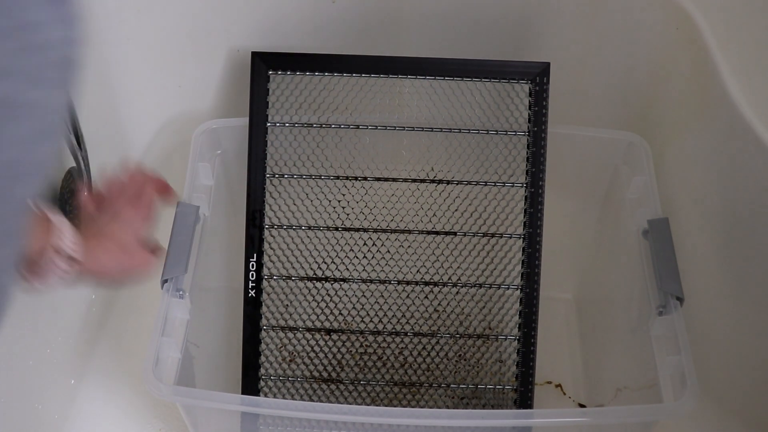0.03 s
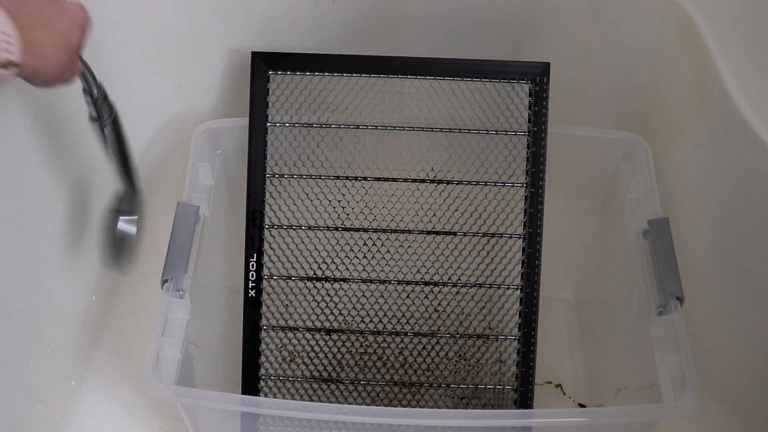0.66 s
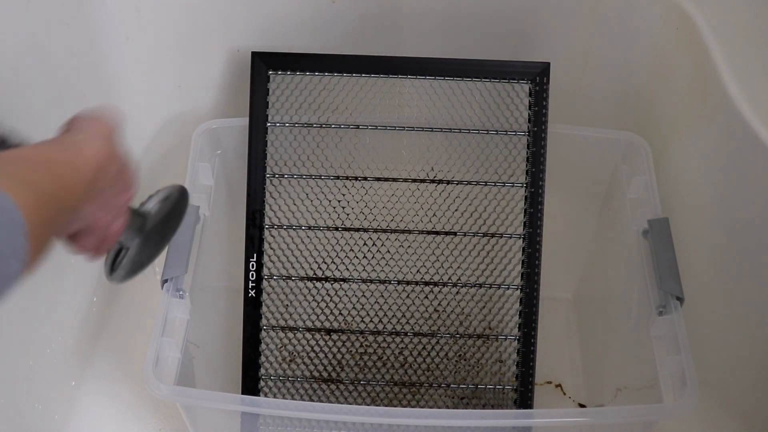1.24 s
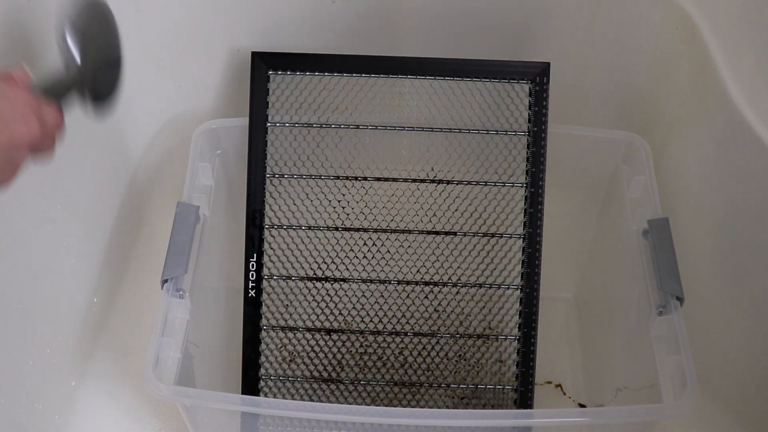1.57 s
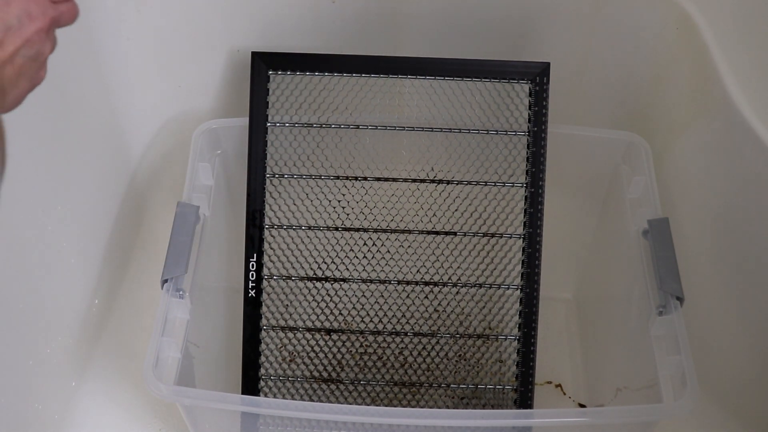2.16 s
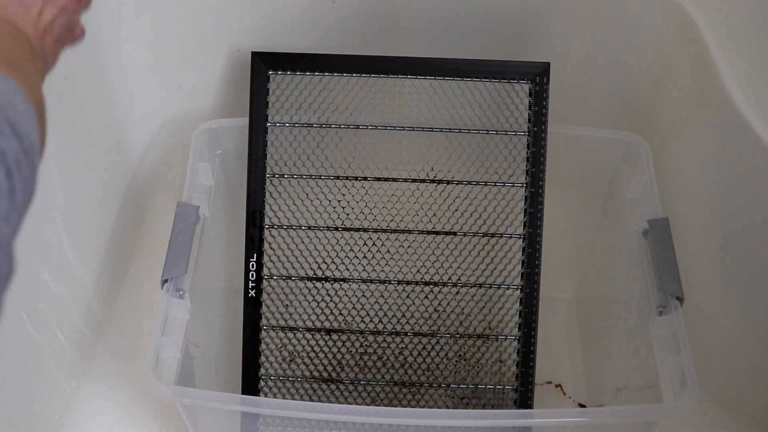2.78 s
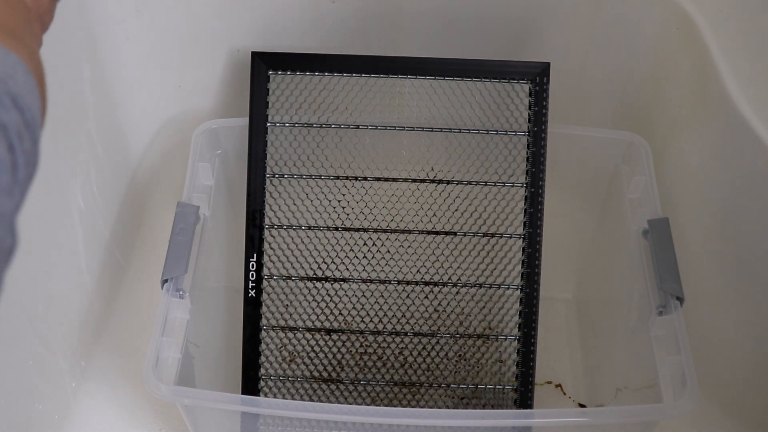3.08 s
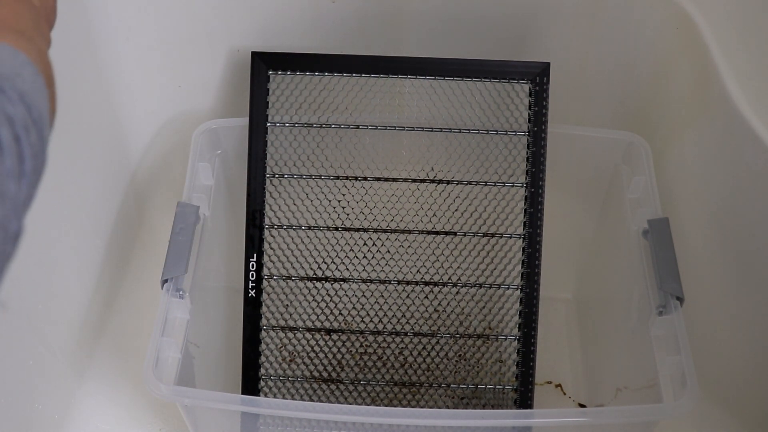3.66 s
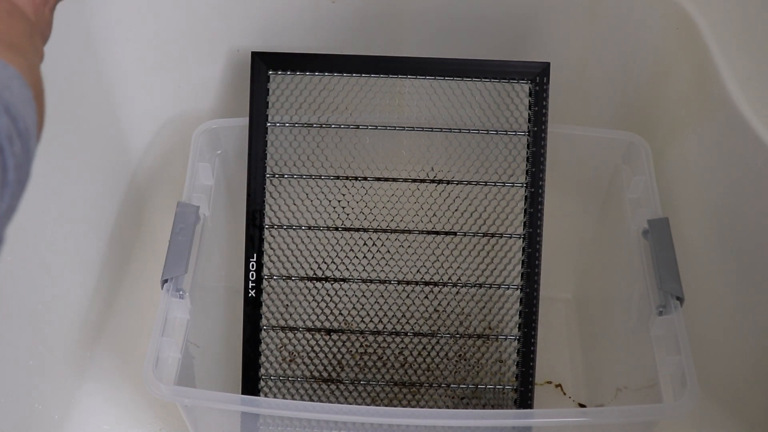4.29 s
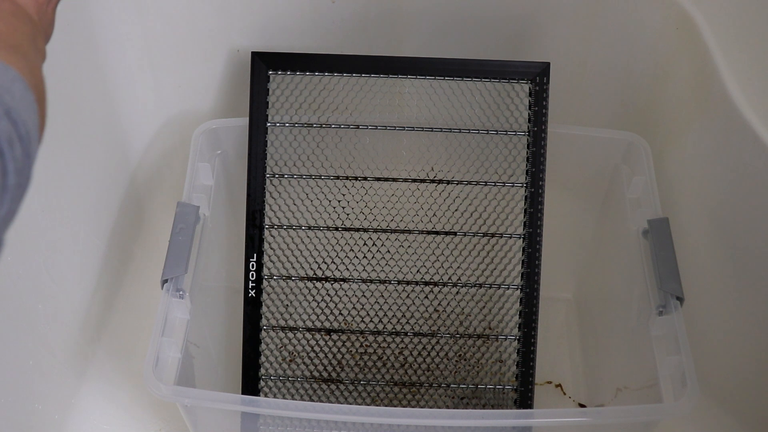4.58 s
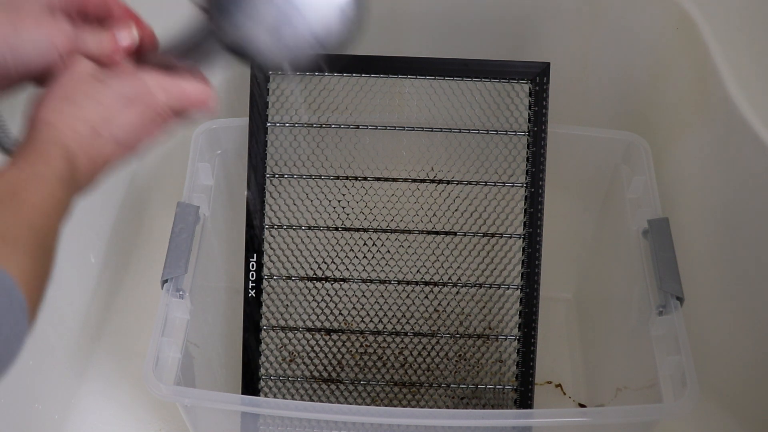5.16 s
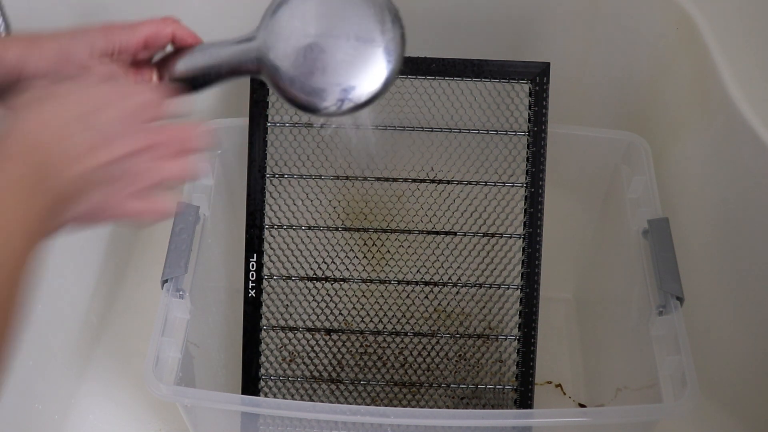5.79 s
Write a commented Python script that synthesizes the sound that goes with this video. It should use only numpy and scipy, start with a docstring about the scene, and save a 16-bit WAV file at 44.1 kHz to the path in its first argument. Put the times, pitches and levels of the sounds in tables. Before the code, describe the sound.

After a few clacks and a tap opening, shower water hisses against a bathtub, then splatters over metal mesh and a hollow plastic bin.

```python
"""Hand shower in a bathtub.

A shower head is picked up with light knocks, squeaks and a brush of the sleeve; the tap is opened.
The jets hiss and patter on the tub wall, then swing over a metal honeycomb grid, which sizzles, and
a plastic tote, which drums. Knocks and random drop impacts drive resonances and filters.
A small hard bathroom answers."""
import sys
import numpy as np
from scipy import signal
from scipy.fft import rfft, irfft, next_fast_len
from scipy.io import wavfile
from scipy.ndimage import map_coordinates

SR = 44100
rng = np.random.default_rng(int(sys.argv[2]) if len(sys.argv) > 2 else 0)


def waveform_to_disk(signal):
    """Save audio, clipped to [-1, 1], as 16-bit WAV at the path in sys.argv[1]."""
    frames = np.transpose(np.atleast_2d(signal))
    scaled = np.clip(frames, -1, 1) * 32767
    samples = np.round(scaled).astype(np.int16)
    wavfile.write(sys.argv[1], SR, samples)


N = 257103

WATER_ON_S, SWING_S, GRID_S, TOTE_S = 2.189, 3.88, 4.26, 4.385  # jets start, swing, reach grid, tote

# hollow tub: freq_hz, width_hz, gain_db
TUB_MODES = [(85.4, 27, -5.5), (183, 25, -2.5), (243, 43, 2), (313, 65, -1), (437, 230, -6)]
# metal hose and nut: freq_hz, width_hz, gain_db
HOSE_MODES = [(8600, 740, -1), (9200, 420, 4.5), (10000, 1800, -5), (11460, 180, -5), (13000, 2300, -24)]
# hard contact: freq_hz, gain_db
CLICK_SPECTRUM = [(100, 5), (700, -4.5), (1500, -2.5), (3800, 8), (6500, 2.5), (10000, 0.5), (15500, -12)]
# tub wall: freq_hz, width_hz, gain_db
WALL_MODES = [(1069, 125, 1.5), (1270, 90, 2.5)]
# bursting drops: freq_hz, gain_db
SPLASH_SPECTRUM = [(700, -33), (1500, -5.5), (2200, -3), (3300, -1.5), (4700, -1.5), (6300, -4), (9000, -8),
                   (12000, -13.5), (14000, -17), (16000, -27)]
# sheets of water bursting off wall and grid: start_s, length_s, level_db
GUSHES = [(2.22, 0.1, -35.5), (2.66, 0.11, -33), (4.26, 0.067, -25), (4.46, 0.096, -32), (4.63, 0.045, -27),
          (4.79, 0.03, -23), (4.88, 0.12, -27), (5.17, 0.035, -26.5), (5.445, 0.035, -41),
          (5.52, 0.046, -29)]
# jet force on the honeycomb: time_s, level_db
GRID_FORCE = [(4.28, -27.5), (5.198, -22.5), (5.216, -23), (5.402, -24), (5.418, -26.5), (5.466, -22),
              (5.57, -29), (5.83, -35.5)]


def amp(db):
    """Decibels to gain."""
    return 10 ** (np.asarray(db) / 20)


def unit(x):
    """Scale to rms 1."""
    return x / np.sqrt(np.mean(x ** 2) + 1e-20)


def along(points, hz):
    """Interpolate (freq_hz, value) points on a log axis."""
    freq_hz, values = np.transpose(points)
    return np.interp(np.log(hz + 1), np.log(freq_hz + 1), values)


def envelope(points):
    """Gain through (time_s, level_db) points; fades 600 dB/s outside them."""
    time_s, level_db = np.transpose(points)
    t = np.arange(N) / SR
    outside_s = np.abs(t - np.clip(t, time_s[0], time_s[-1]))
    return amp(np.interp(t, time_s, level_db) - 600 * outside_s)


def held(start_s, end_s, attack_s, release_s):
    """Gain that rises from start_s, holds, and decays after end_s."""
    t = np.arange(N) / SR
    rise = 1 - np.exp(-np.maximum(t - start_s, 0) / attack_s)
    return rise * np.exp(-np.maximum(t - end_s, 0) / release_s)


def swells(rows, shape=0.38):
    """One arch of gain per (start_s, length_s, level_db); higher shape is more peaked."""
    t = np.arange(N) / SR
    return sum(amp(db) * np.abs(np.sin(np.pi * np.clip((t - start_s) / length_s, 0, 1))) ** shape
               for start_s, length_s, db in rows)


def wobble(rate_hz):
    """Smooth random curve, rate_hz knots a second."""
    knots = rng.standard_normal(int(N * rate_hz / SR) + 4)
    return map_coordinates(knots, [np.arange(N) * rate_hz / SR])


def filtered(x, response):
    """Apply a complex frequency response."""
    size = 2 * next_fast_len((N + SR) // 2)
    return irfft(rfft(x, size) * response(np.fft.rfftfreq(size, 1 / SR)), size)[:N]


def same_power(response):
    """Scale a response so white noise keeps its level."""
    return response / np.sqrt(np.mean(np.abs(response) ** 2))


def coloured(x, points):
    """Minimum-phase filter through (freq_hz, gain_db) points; rolls off below the first."""
    def response(hz):
        skirt = np.minimum(hz / points[0][0], 1) ** 2
        cepstrum = irfft(np.log(amp(along(points, hz)) * skirt + 1e-6))
        half = len(cepstrum) // 2
        causal = np.r_[cepstrum[0], 2 * cepstrum[1:half], np.zeros(half)]
        return same_power(np.exp(rfft(causal)))
    return filtered(x, response)


def ringing(x, modes):
    """Parallel (freq_hz, width_hz, gain_db) resonances of alternating sign."""
    def response(hz):
        return same_power(sum(
            (-1) ** k * amp(db) * 1j * hz * width_hz / (mode_hz ** 2 - hz ** 2 + 1j * hz * width_hz)
            for k, (mode_hz, width_hz, db) in enumerate(modes)))
    return filtered(x, response)


def patchy(x, depth_db, width_hz, length_s):
    """Random gain patches in time and frequency: the jets keep finding new spots."""
    spectrum = signal.stft(x, SR, nperseg=512)[2]
    bins, frames = np.indices(spectrum.shape)
    where = [bins * SR / 512 / width_hz, frames * 256 / SR / length_s]
    field = map_coordinates(rng.standard_normal(spectrum.shape), where, mode="wrap")
    return signal.istft(spectrum * amp(depth_db * field), SR, nperseg=512)[1][:N]


def impacts(rate_hz, spread_db):
    """Randomly timed impulses of log-normal size; rms 1."""
    count = int(rate_hz * N / SR)
    sizes = amp(spread_db * np.clip(rng.standard_normal(count), -2.5, 2.5))
    sizes *= rng.choice([-1, 1], count)
    return unit(np.bincount(rng.integers(0, N, count), sizes, N))


def plinks(rate_hz, centre_hz, scatter, decay_cycles, spread_db):
    """Tiny damped rings at random times and pitches; rms 1."""
    count = int(rate_hz * N / SR)
    pitch, size = np.clip(rng.standard_normal((2, count, 1)), -2.2, 2.2)
    k = np.arange(SR // 100)
    cycles = centre_hz * np.exp(scatter * pitch) * k / SR
    rings = amp(spread_db * size) * np.sin(2 * np.pi * cycles) * np.exp(-cycles / decay_cycles)
    onsets = rng.integers(0, N, (count, 1))
    motion = np.bincount((onsets + k).ravel(), rings.ravel(), N)[:N]
    return unit(np.gradient(motion))  # only the change of motion radiates


def blows(times_s, levels_db, t60_s, room_t60_s, wet_db):
    """Per contact: a sharp push, a dying chatter and a diffuse echo off the tiles."""
    force, t = np.zeros(N + SR), np.arange(SR // 4) / SR
    for start_s, db, chatter_s in zip(times_s, levels_db, np.broadcast_to(t60_s, len(times_s))):
        chatter, echo = rng.standard_normal((2, len(t)))
        chatter *= amp(-60 * t / chatter_s)
        chatter *= 1 - np.exp(-2 * t / chatter_s ** 2)  # long, sliding contacts start softly
        chatter[0] = 4 * np.exp(-chatter_s / 0.065)  # brief contacts push harder
        echo *= amp(-60 * t / room_t60_s) * (1 - np.exp(-t / 0.0021))
        echo = amp(wet_db) * np.sqrt(np.mean(chatter ** 2)) * unit(echo)
        force[round(start_s * SR):][:len(t)] += amp(db) * (chatter + echo)
    return force[:N]


def sing(rows):
    """One swell of narrow-band noise per row."""
    t, out = np.arange(N) / SR, np.zeros(N)
    for start_s, length_s, pitch_hz, width_hz, db in rows:
        phase = 2 * np.pi * pitch_hz * t
        tone = unit(wobble(width_hz) * np.cos(phase) + wobble(width_hz) * np.sin(phase))
        out += amp(2.2 * wobble(30)) * swells([(start_s, length_s, db)]) * tone
    return out


def bathroom(x, wet_db):
    """Direct sound plus the tiles' dense echo, at about equal total power."""
    # room decay: freq_hz, t60_s
    decay = [(150, 0.3), (600, 0.64), (2500, 0.49), (8000, 0.067), (15000, 0.11)]
    hz, t, noise = signal.stft(rng.standard_normal(SR // 2), SR, nperseg=256)
    tail = signal.istft(noise * amp(-60 * t / along(decay, hz)[:, None]), SR, nperseg=256)[1]
    delayed = np.pad(x, (SR // 250, 0))
    echo = signal.fftconvolve(delayed, tail / np.sqrt(np.sum(tail ** 2)))[:N]
    return (x + amp(wet_db) * echo) / np.hypot(1, amp(wet_db))


def room_air():
    """Faint steady room noise."""
    # air: freq_hz, gain_db
    spectrum = [(15, -61), (25, -31), (70, -17), (82, -10), (242, -6.5), (326, -4), (416, -7), (775, -12),
                (1520, -15), (9840, -21.5), (14800, -22.5), (16000, -25.5)]
    return amp(-66) * coloured(rng.standard_normal(N), spectrum)


def squeaks():
    """The hand rubs on the shower head."""
    # rubs: start_s, length_s, pitch_hz, width_hz, level_db
    rubs = [(0.44, 0.086, 1350, 704, -70), (0.56, 0.1, 1300, 700, -69), (1.566, 0.075, 440, 160, -57),
            (1.645, 0.035, 4000, 700, -60), (1.76, 0.023, 2870, 220, -45), (1.78, 0.05, 2800, 149, -56)]
    return sing(rubs)


def knocks():
    """Each knock shakes tub, head shell and metal hose in its own proportions."""
    # contacts: start_s, thud_db, clack_db, click_db, tick_db, t60_s
    contacts = [(0.475, -62, -65, -70, -45, 0.15), (0.68, -68, -73, -58, -54, 0.21),
                (0.721, -54, -49, -35.5, -39, 0.016), (1.188, -62, -66, -52, -41, 0.022),
                (1.194, -43.5, -20, -32, -33.5, 0.017), (1.340, -64, -28, -38.5, -55, 0.013),
                (1.475, -70, -70, -70, -52, 0.063), (1.568, -59, -52, -40, -22.5, 0.008),
                (1.574, -52, -54, -36.5, -28, 0.013), (1.686, -51, -55, -47, -37, 0.019),
                (1.699, -60, -58, -44, -41, .012), (1.706, -34, -30, -29, -24.5, 0.014),
                (1.745, -50, -60, -54, -60, 0.045), (1.843, -62, -54, -54, -45, 0.099),
                (1.88, -54, -62, -60, -46, 0.22), (2.121, -58, -72, -70, -50.5, 0.06),
                (3.9302, -54, -25, -24, -16, 0.0072)]
    # shower head shell: freq_hz, width_hz, gain_db
    shell_modes = [(1620, 250, -3.5), (2040, 240, -1), (2680, 420, 0), (3460, 930, -8), (5050, 650, -7.5),
                   (6700, 600, -14.5)]
    # the small shell radiates no bass: freq_hz, gain_db
    shell_radiation = [(500, -8), (1100, 3), (1450, -1), (7000, -0.5), (9000, -42), (15000, -41)]
    start_s, thud_db, clack_db, click_db, tick_db, t60_s = np.transpose(contacts)
    thud = ringing(blows(start_s, thud_db, t60_s, room_t60_s=0.42, wet_db=6.5), TUB_MODES)
    shell = ringing(blows(start_s, clack_db, t60_s, room_t60_s=0.28, wet_db=1), shell_modes)
    clack = amp(-4.5) * coloured(shell, shell_radiation)
    click = coloured(blows(start_s, click_db, t60_s, room_t60_s=0.32, wet_db=2), CLICK_SPECTRUM)
    tick = ringing(blows(start_s, tick_db, t60_s, room_t60_s=0.21, wet_db=0), HOSE_MODES)
    return thud + clack + click + tick


def sleeve_and_hose():
    """Cloth brushes and the hose slides as the arm reaches for the shower head."""
    # sleeve stroke: start_s, length_s, level_db
    stroke = [(1.02, 0.59, -51.5)]
    # cloth friction: freq_hz, gain_db
    cloth_spectrum = [(180, -36), (300, -3), (490, -13.5), (959, -9), (1040, -15), (1330, -7.5), (4770, -1),
                      (9800, -16), (15000, -29)]
    # hose slide: start_s, length_s, level_db
    slide = [(0.87, 0.45, -68)]
    cloth = coloured(impacts(rate_hz=12000, spread_db=3), cloth_spectrum)
    hose = ringing(impacts(rate_hz=3000, spread_db=1), HOSE_MODES)
    return amp(2) * swells(stroke, shape=1.38) * cloth + swells(slide, shape=0.7) * hose


def pipe_surge():
    """Pipe and hose rumble as water pushes the air out."""
    # pipe: freq_hz, width_hz, gain_db
    modes = [(80, 25, -7), (176, 21, 2), (231, 22, -1.5), (290, 60, -2)]
    # surges as the tap is worked: start_s, length_s, level_db
    surges = [(1.76, 0.3, -63), (2.11, 0.076, -42.5), (2.17, 0.26, -45.5)]
    rumble = coloured(ringing(rng.standard_normal(N), modes), [(40, 2), (400, 5), (1200, -3)])
    return swells(surges, shape=0.3) * unit(rumble)


def tap():
    """The valve snaps open; its hollow body rings and the tub thuds."""
    # tap body: freq_hz, width_hz, gain_db
    modes = [(1050, 190, -4), (1640, 140, -3), (1960, 160, 0.5), (2750, 440, -4.5), (3540, 330, -0.5),
             (4450, 200, -0.5)]
    snap = blows([2.057], [-37], t60_s=0.049, room_t60_s=0.29, wet_db=2.5)
    body = coloured(ringing(snap, modes), [(900, 3), (4700, -0.5), (5600, -11), (12000, -13)])
    thud = ringing(snap, TUB_MODES)
    click = coloured(snap, CLICK_SPECTRUM)
    return amp(-3) * body + amp(-8.5) * thud + amp(-7.5) * click


def first_burst(settle_s=0.36):
    """Overshoot of the spray: decays from 1 once the water is on."""
    return np.exp(-np.maximum(np.arange(N) / SR - WATER_ON_S, 0) / settle_s)


def spit():
    """The first slug of water hits the wall."""
    # slug impact: freq_hz, gain_db
    spectrum = [(300, -8), (1100, -2), (2500, -5), (5000, -12), (12000, -24)]
    slug = blows([WATER_ON_S], [-29.5], t60_s=0.055, room_t60_s=0.15, wet_db=-3)
    return coloured(amp(-12) * ringing(slug, WALL_MODES) + amp(-10) * slug, spectrum)


def wall_drumming():
    """Dense drops drum on the tub wall, harder in the first burst and the swing."""
    # wall body: freq_hz, gain_db
    spectrum = [(50, -42), (85, -18), (120, -25), (160, -9.5), (240, -6.5), (292, 6), (345, -1.5),
                (430, -2.5), (480, -1.5), (820, 0.5), (1200, 1.5), (1500, -2.5), (2300, -7), (3300, -27.5)]
    on_wall = held(WATER_ON_S, TOTE_S, attack_s=0.049, release_s=0.025)
    swing = held(SWING_S, GRID_S, attack_s=0.098, release_s=0.03)
    force = on_wall * amp(-36.5 + 5 * swing + 3 * first_burst())
    return force * coloured(impacts(rate_hz=4000, spread_db=3.5), spectrum)


def wall_ring():
    """Drops ring the wall, louder once the jets find a hollow spot."""
    on_wall = held(WATER_ON_S, TOTE_S, attack_s=0.049, release_s=0.025)
    on_hollow = held(3.42, TOTE_S, attack_s=0.028, release_s=0.02)
    force = on_wall * amp(-44 + 6.5 * on_hollow)
    return force * ringing(impacts(rate_hz=4000, spread_db=5), WALL_MODES)


def splash():
    """Fine and heavy drops burst wherever the spray lands, more so on the grid."""
    pressure = held(WATER_ON_S, N / SR, attack_s=0.027, release_s=0.027)
    steady = amp(-32) * pressure ** 3
    off_grid = amp(-6) * envelope(GRID_FORCE)
    flow = np.sqrt(steady ** 2 + off_grid ** 2 + swells(GUSHES, shape=0.3) ** 2)
    fine = amp(-3) * impacts(rate_hz=16000, spread_db=1)
    heavy = amp(-8) * impacts(rate_hz=600, spread_db=1)
    bursts = coloured(amp(1 + 0.3 * wobble(30)) * flow * (fine + heavy), SPLASH_SPECTRUM)
    return bathroom(patchy(bursts, depth_db=1.4, width_hz=603, length_s=0.05), wet_db=-12)


def jet_hiss():
    """Jets break into mist, fading as they turn away; hose air fizzes out with the first burst."""
    # nozzle hiss: freq_hz, gain_db
    hiss_spectrum = [(5500, -15.5), (7500, -11), (8900, -6), (10100, 0), (11000, -4.5), (12300, -13.5),
                     (15000, -36)]
    # escaping air: freq_hz, gain_db
    fizz_spectrum = [(5000, -18), (7500, -4), (9000, 4), (10000, -1), (12000, -9), (15500, -24)]
    facing = held(2.243, SWING_S, attack_s=0.058, release_s=0.011)
    turned = held(SWING_S, SWING_S + 0.19, attack_s=0.015, release_s=0.16)
    jet_gain = (amp(-32) * facing + amp(-42) * turned) * amp(0.77 * wobble(25.02))
    hiss = jet_gain * coloured(impacts(rate_hz=32000, spread_db=5.5), hiss_spectrum)
    air_gain = amp(-28.5) * facing * np.sqrt(first_burst())
    fizz = air_gain * coloured(impacts(rate_hz=9000, spread_db=3), fizz_spectrum)
    return patchy(hiss + fizz, depth_db=0.9, width_hz=448, length_s=0.08)


def whistles():
    """The jets dwell on one spot and make it sing."""
    # spots: start_s, length_s, pitch_hz, width_hz, level_db
    spots = [(3.05, 0.95, 2760, 209.7, -42.5), (2.94, 0.52, 4760, 517, -41), (3.24, 0.26, 5310, 479, -42),
             (3.5, 0.98, 4180, 600, -42.5), (4.96, 0.3, 474.5, 24.05, -27.5), (5.29, 0.12, 8300, 913, -31),
             (5.6, 0.25, 281, 60, -31.5)]
    return sing(spots)


def grid():
    """Jets cross the honeycomb's foil edges in spurts; cells plink and single jets splat hard."""
    # foil edges: freq_hz, gain_db
    foil_spectrum = [(5000, -14), (7000, -2.5), (8400, 2), (10000, 1), (11500, -0.5), (13000, -12),
                     (16000, -48)]
    # hard splats: start_s, splash_db, foil_db
    splats = [(4.2323, -21, -24), (4.39, -30, -18), (4.466, -18.5, -21), (4.6559, -24, -19),
              (4.7645, -16, -27), (4.798, -17, -32), (4.8835, -14.5, -22), (5.0092, -15.5, -18),
              (5.111, -24, -16), (5.1738, -13, -15), (5.3782, -32, -17), (5.4524, -24, -19),
              (5.468, -26, -16.5)]
    force = amp(-2) * envelope(GRID_FORCE)
    spurts = amp(-1 + 1.2 * wobble(60)) * force * impacts(rate_hz=4900, spread_db=4.5)
    foil = coloured(patchy(spurts, depth_db=2, width_hz=621, length_s=0.035), foil_spectrum)
    cells = plinks(rate_hz=350, centre_hz=8930, scatter=0.16, decay_cycles=8.6, spread_db=1.5)
    pockets = plinks(rate_hz=600, centre_hz=4340, scatter=0.142, decay_cycles=8.6, spread_db=6)
    flooding = amp(-12) * force + amp(-11.5) * swells(GUSHES)
    sizzle = foil + amp(-6.5) * force * cells + flooding * pockets
    start_s, splash_db, foil_db = np.transpose(splats)
    crack = coloured(blows(start_s, foil_db, t60_s=0.022, room_t60_s=0.18, wet_db=-4), foil_spectrum)
    splat = blows(start_s, splash_db, t60_s=0.018, room_t60_s=0.1, wet_db=-14)
    return bathroom(sizzle, wet_db=-14) + crack + coloured(splat, SPLASH_SPECTRUM)


def tote():
    """Thin plastic drums with the jet force, booms at the bottom and slaps at the rim."""
    # jet force: time_s, level_db
    jet_force = [(4.395, -31), (4.581, -27.5), (4.981, -30), (5.029, -23), (5.353, -24.5), (5.421, -30.5),
                 (5.713, -29), (5.773, -26), (5.83, -36.5)]
    # jets hit the bottom: start_s, length_s, level_db
    booms = [(4.48, 0.1, -33), (5.21, 0.084, -24.5), (5.35, 0.12, -26), (5.63, 0.037, -38),
             (5.745, 0.054, -27)]
    # jets cross the rim: start_s, length_s, level_db
    slaps = [(4.99, 0.12, -21.5), (5.44, 0.055, -19), (5.51, 0.062, -19.5), (5.765, 0.027, -31)]
    # bottom: freq_hz, gain_db
    bottom_spectrum = [(40, -41), (75, -21), (105, -21.5), (150, -5.5), (200, -3), (250, -5.5), (290, 3.5),
                       (350, -5), (420, -5), (560, -34.5)]
    # panels: freq_hz, width_hz, gain_db
    panel_modes = [(155, 29, -10.5), (205, 73, -8), (292, 22, 6.5), (346, 41, 3), (413, 15, 5),
                   (430, 6.1, -15), (488, 44, 1), (580, 23, 1.5), (676, 15, -2.5), (730, 36, -7)]
    # walls: freq_hz, gain_db
    wall_spectrum = [(280, -21.5), (420, -5.5), (480, 0.5), (650, 2), (1000, -0.5), (1250, -4.5),
                     (1700, -21)]
    # rim: freq_hz, gain_db
    rim_spectrum = [(850, -10.5), (1250, 0), (1550, -1), (1950, -3.5), (2400, -8), (3400, -19)]
    force = envelope(jet_force)
    relative_force = force / amp(np.mean(np.transpose(jet_force)[1]))
    on_tote = held(TOTE_S, N / SR, attack_s=0.0068, release_s=1)
    boom = np.hypot(amp(-32) * relative_force ** 0.79 * on_tote, swells(booms))
    slap = np.hypot(amp(-31) * relative_force ** 0.76, swells(slaps))
    bottom = amp(-3) * boom * coloured(impacts(rate_hz=2000, spread_db=3.5), bottom_spectrum)
    panels = amp(-4.5) * boom * ringing(impacts(rate_hz=2000, spread_db=2), panel_modes)
    walls = amp(-0.1) * force * coloured(impacts(rate_hz=2500, spread_db=3.5), wall_spectrum)
    rim = amp(-1) * slap * coloured(impacts(rate_hz=2500, spread_db=1), rim_spectrum)
    return bottom + panels + bathroom(walls + rim, wet_db=-7)


def scene():
    """All sources, the same in both channels."""
    mono = room_air() + knocks() + sleeve_and_hose() + squeaks() + tap() + pipe_surge()
    mono += wall_drumming() + bathroom(wall_ring() + spit() + jet_hiss(), wet_db=-9)
    mono += splash() + tote() + grid() + whistles()
    return np.array([mono, mono])


def record(dry):
    """Brick-wall low-pass."""
    top_hz = 16050
    return np.array([filtered(channel, lambda hz: hz < top_hz) for channel in dry])


dry = scene()
out = record(dry)
waveform_to_disk(out)
```